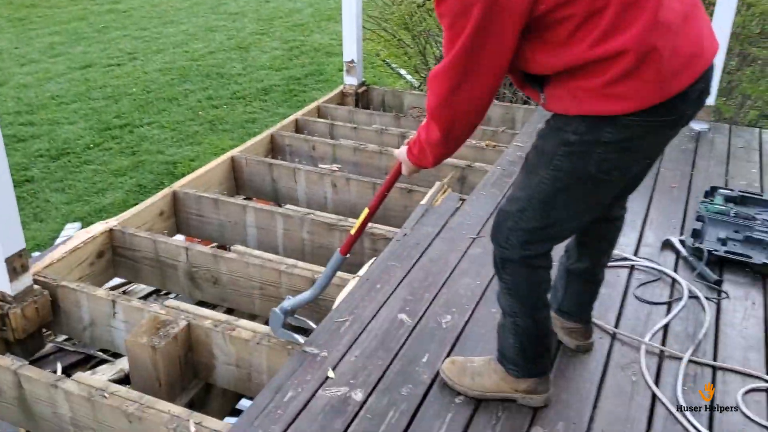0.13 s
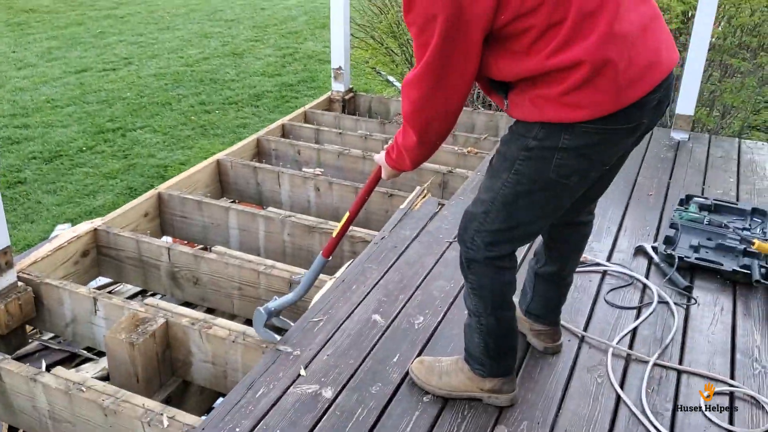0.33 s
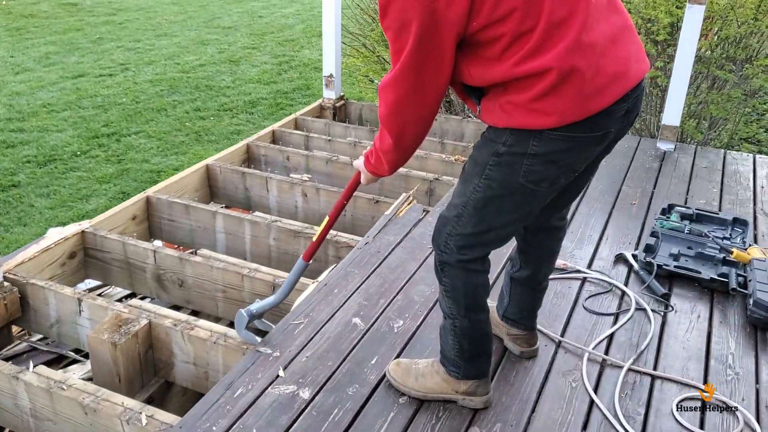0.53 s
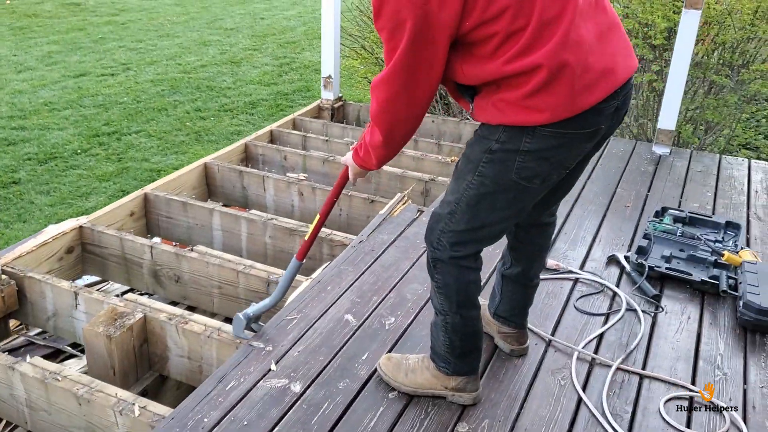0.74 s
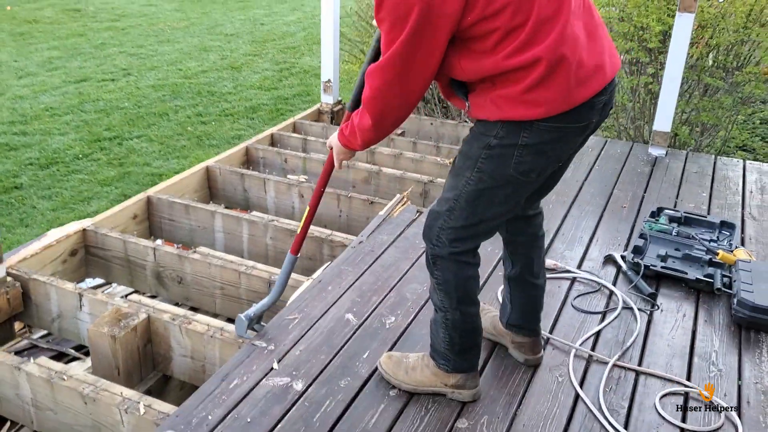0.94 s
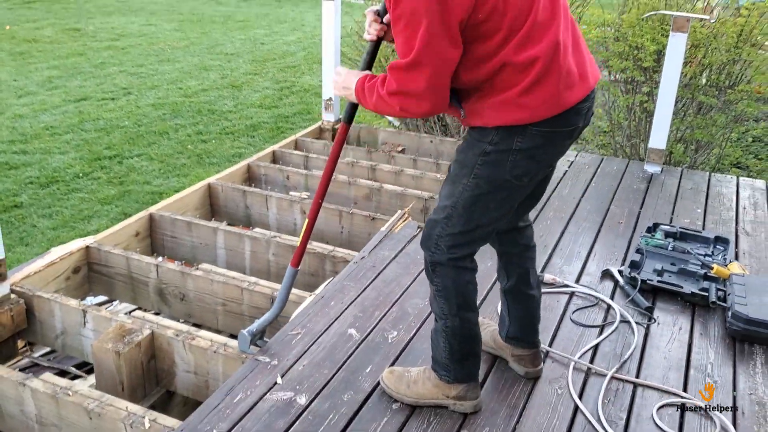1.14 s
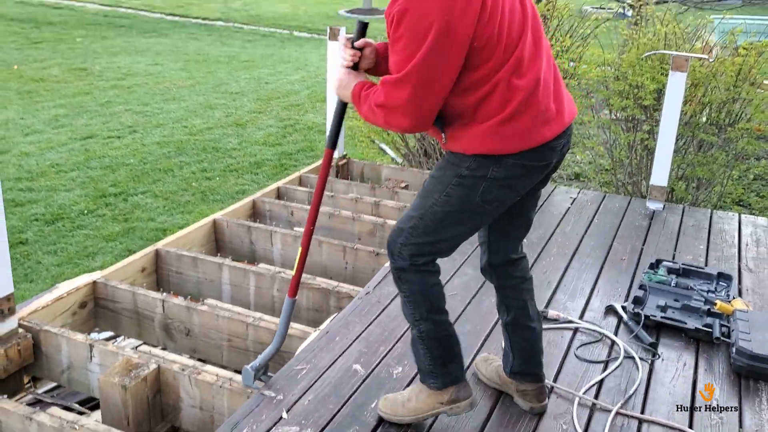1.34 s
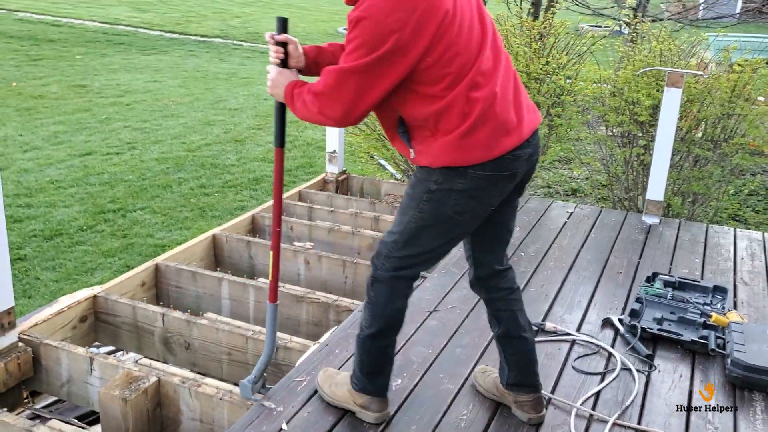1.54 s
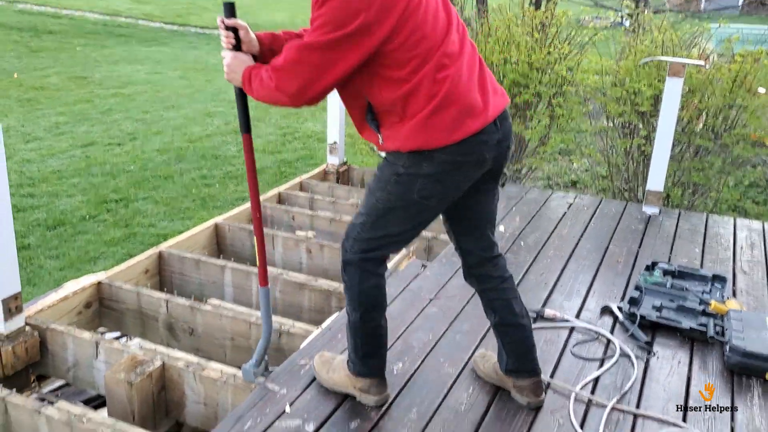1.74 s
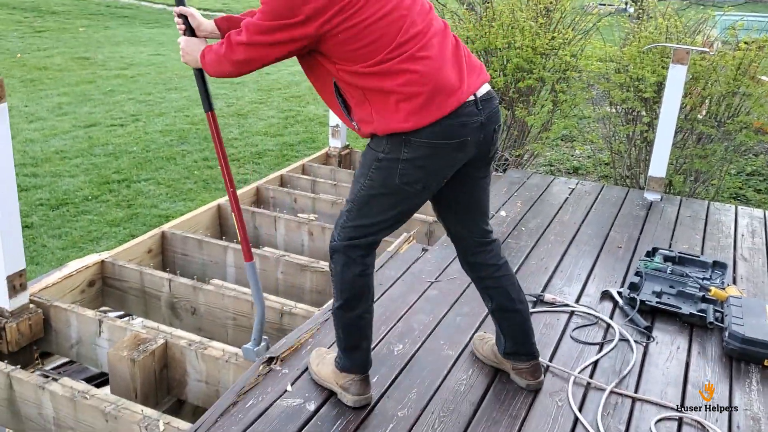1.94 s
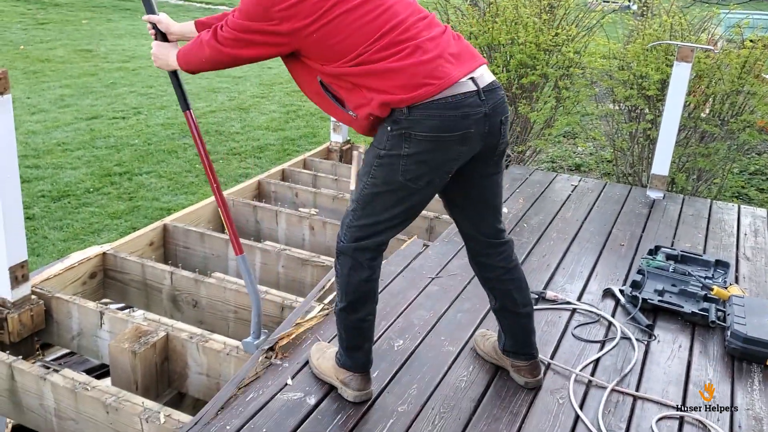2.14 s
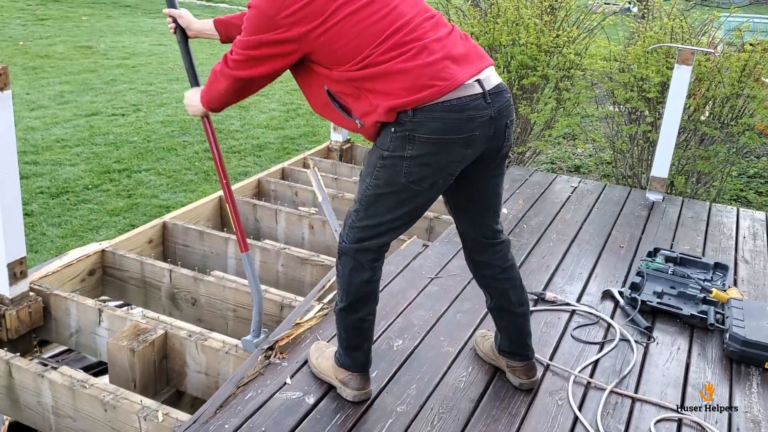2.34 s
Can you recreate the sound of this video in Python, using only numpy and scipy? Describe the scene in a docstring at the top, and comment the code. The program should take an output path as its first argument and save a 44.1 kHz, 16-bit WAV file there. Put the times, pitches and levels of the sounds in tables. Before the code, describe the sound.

Wood cracking: a pry bar knocks on deck boards, then a rotten plank splits with heavy thumps

```python
"""Quiet outdoor air, then a steel pry bar taps and knocks on old deck boards, scrapes, skids and rings.
Levered back, it splits a rotten board in a run of cracks with tearing fibres and heavy thumps.
A faint scrape and a lone tick close the scene.
Wood is coloured noise shaped by decaying blows, thumps and steel are decaying sines, friction and
tearing are showers of tiny snaps, and the joists answer each jolt with a low noise rumble."""
import sys
import numpy as np
from scipy import signal
from scipy.fft import rfft, irfft
from scipy.io import wavfile
from scipy.ndimage import uniform_filter1d

SR = 44100
rng = np.random.default_rng(int(sys.argv[2]) if len(sys.argv) > 2 else 0)


def bounce(signal):
    """Save signal as a 16-bit WAV file at the path given by the first command-line argument."""
    frames = np.transpose(np.atleast_2d(signal))
    limited = np.clip(frames, -1, 1)
    pcm = np.round(limited * 32767).astype(np.int16)
    wavfile.write(sys.argv[1], SR, pcm)


N = 110250
TIME = np.arange(N) / SR  # s


def from_db(db):
    """Decibels to gain."""
    return 10 ** (np.asarray(db) / 20)


def rms_one(x):
    """Scale to rms 1."""
    return x / np.sqrt(np.mean(x ** 2) + 1e-20)


def at_hz(points, hz):
    """Read a spectrum on a log-frequency axis."""
    f, value = np.transpose(points)
    return np.interp(np.log(hz + 1), np.log(f), value)


# how alike left and right are: (f/Hz, likeness from 0 to 1)
STEREO_LIKENESS = [(100,0.93),(300,0.97),(600,0.78),(1200,0.51),(2500,0.29),(5000,0.1),(14000,0.16)]


def noise(spectrum, low_hz=15, high_hz=20000):
    """Coloured stereo noise in a band, broadly wider toward the treble; rms 1."""
    hz = np.arange(N // 2 + 1) * SR / N
    alike = np.clip(at_hz(STEREO_LIKENESS, hz), 0, 1)
    mid, side = rfft(rng.standard_normal((2, N)))
    pair = np.sqrt(1 + alike) * mid + np.sqrt(1 - alike) * side * [[1], [-1]]
    in_band = (hz > low_hz) * (hz < high_hz)
    return rms_one(irfft(pair * from_db(at_hz(spectrum, hz)) * in_band, N))


def even(x, window_s):
    """Hold the level of a noise steady, so that the blow alone shapes it."""
    power = np.mean(np.abs(signal.hilbert(x)) ** 2, axis=0) / 2
    return x / np.sqrt(uniform_filter1d(power, max(1, int(window_s * SR))) + 1e-6)


def swell(s, rise_s, t60):
    """Quick rise at time s, then exponential decay."""
    age = np.maximum(TIME - s, 0)
    rise = 1 - np.exp(-np.minimum(age / rise_s, 20))
    return rise * from_db(-60 * np.minimum(age / t60, 2))


def dying(times, db, t60):
    """Power left by a series of blows, each dying at the same rate."""
    kicks = np.zeros(N)
    np.add.at(kicks, (np.asarray(times) * SR).astype(int), from_db(db) ** 2)
    keep = np.exp(-2 * np.log(1000) / (t60 * SR))
    return signal.lfilter([1], [1, -keep], kicks + 1e-18)


def softened(power, rise_s):
    """Amplitude envelope of that power, with a rounded attack."""
    r = np.exp(-1 / (rise_s * SR))
    return np.sqrt(signal.lfilter([1 - r], [1, -r], power))


# resonances that stand out of the timber's colour: (f/Hz)
BOARD_RESONANCES = [197, 281, 382, 641, 835, 1011, 1169, 1295, 1410, 1600, 1790, 3274]
BOARD_MODE_DB, BOARD_MODE_WIDTH = 5.5, 0.0074  # height, and half-width as a share of the pitch


def with_modes(x):
    """Raise the resonances of the boards, then level to rms 1."""
    hz = np.arange(N // 2 + 1) * SR / N
    lift = sum(1 / (1 + ((hz / mode - 1) / BOARD_MODE_WIDTH) ** 2) for mode in BOARD_RESONANCES)
    return rms_one(irfft(rfft(x) * from_db(BOARD_MODE_DB * lift), N))


COLOUR_SHIFT_DB = 3.5  # rms spread of the wandering colour


def restless(x):
    """Let the timber's colour wander, as snaps start at different spots in the board."""
    cells = signal.stft(x, nperseg=512)[2]
    lift = rng.standard_normal(cells.shape[1:])
    lift = uniform_filter1d(lift, size=5, axis=0)  # across pitch
    lift = uniform_filter1d(lift, size=3, axis=1)  # across time
    return signal.istft(cells * from_db(COLOUR_SHIFT_DB * rms_one(lift)))[1][:, :N]


# colour of the struck timber, before its resonances: (f/Hz, level/dB per Hz)
TIMBER_COLOUR = [(150,-8),(210,-5),(280,4.5),(390,1.5),(490,-8),(570,-14),(700,-6.5),(1020,-9.5),(1450,-15),(1850,-12),(2600,-18.5),(3400,-9.5),(4400,-11.5),(5800,-20.5),(6900,-17.5),(8300,-27),(11000,-20.5),(15500,-22.5)]
YARD_DB, YARD_T60_S = -33.5, 0.49  # faint return from the yard, relative to each blow
LOWS_LINGER = 1.18  # the lower half of each range rings this much longer, the upper this much shorter


def timber(blows, decays, rise_s, gain_db, grain=1):
    """Blows excite dense wood modes: a short burst, a tail through the deck, a yard return."""
    s, *levels = np.transpose(blows)
    out = 0
    for db, (low, high, first, tail_db, tail) in zip(levels, decays):
        wood = even(restless(with_modes(noise(TIMBER_COLOUR, low, high))), 2 / low)
        if low > 2000:  # only snap and hiss take on the grain
            wood = wood * grain
        split = signal.butter(2, np.sqrt(low * high), fs=SR, output="sos")
        lower = signal.sosfiltfilt(split, wood)
        for half, stretch in ((lower, LOWS_LINGER), (wood - lower, 1 / LOWS_LINGER)):
            burst = dying(s, db, first * stretch)
            deck_tail = dying(s, db + tail_db, tail * stretch)
            yard = dying(s, db + YARD_DB, YARD_T60_S)
            # low ranges speak a little more slowly
            out = out + softened(burst + deck_tail + yard, rise_s + .5 / high) * half
    return from_db(gain_db) * out


def grains(spans, spectrum, per_s, spread_db, grain_t60):
    """Tiny snaps of uneven size at random moments, swelling and fading over each span."""
    level = 0
    for start, end, db in spans:
        progress = np.clip((TIME - start) / (end - start), 0, 1)
        level = level + from_db(db) * np.sqrt(np.abs(np.sin(np.pi * progress)))
    happens = rng.random(N) < per_s / SR
    sizes = from_db(spread_db * np.minimum(rng.exponential(1, N), 4))
    clicks = rms_one(happens * sizes * rng.choice([-1, 1], N)) * level
    # ten different snaps, dealt out at random
    dealt = rng.integers(0, 10, N)
    source, size, out = noise(spectrum), 1024, 0
    for k in range(10):
        snap = source[:, k * size:(k + 1) * size] * from_db(-60 * TIME[:size] / grain_t60)
        snap = rms_one(snap) / np.sqrt(size)
        out = out + signal.oaconvolve([clicks * (dealt == k)], snap, axes=1)[:, :N]
    return out


# distant outdoor murmur: (f/Hz, level/dB per Hz, relative)
AIR_COLOUR = [(20,-34.5),(55,2),(110,-5.5),(260,-14),(500,-21),(1100,-26),(2000,-28.5),(2650,-37),(4000,-26.5),(6500,-33),(8000,-40),(16000,-47)]
AIR_DB = -54  # rms


def outdoor_air():
    """A distant murmur: steady, coloured stereo noise."""
    return from_db(AIR_DB) * noise(AIR_COLOUR)


# the blade's edge taps the wood: (t/s, level/dB, f/Hz)
EDGE_TAPS = [(0.097,-42,1590),(0.128,-42,3540),(.327,-32,1980),(0.647,-39,1030),(0.661,-43.5,1930),(.699,-42.5,1120),(0.702,-35.5,1700),(0.743,-26,1705)]
TAP_RISE_S, TAP_T60_S = 0.00066, 0.074
# the noise band reaches this ratio either side of its pitch, and is this much weaker there
TAP_SPREAD, TAP_SKIRT_DB = 1.6, -26


def taps():
    """Each tap wakes the damped resonances around one pitch, heard as a decaying noise band."""
    out = 0
    for s, db, hz in EDGE_TAPS:
        low, high = hz / TAP_SPREAD, hz * TAP_SPREAD
        cluster = noise([(low, TAP_SKIRT_DB), (hz, 0), (high, TAP_SKIRT_DB)], low, high)
        out = out + from_db(db) * swell(s, TAP_RISE_S, TAP_T60_S) * even(cluster, 10 / hz)
    return out


# a board or the frame swings at one pitch: (t/s, level/dB before rise and decay, f/Hz, rise/s, t60/s)
BOARD_THUMPS = [(0.127,-22,343,0.0016,0.098),(0.341,-25,321,0.011,0.094),(0.653,-15,237,0.001,0.024),(0.741,3,259.3,0.011,0.092),(.747,-11,382,0.0065,0.13),(0.811,-18,481,0.0025,0.061),(.810,-16,620,0.0012,0.06),(0.806,-22.5,116.2,0.0089,0.2),(1.11,-31,287,0.0068,0.073),(1.53,-20,425.5,0.01,0.12),(1.7245,0,1025,0.0015,0.022),(1.726,-15,311,0.0017,0.13),(1.786,-12,272,0.0061,0.081),(1.883,2.5,300,0.0022,0.026),(1.965,-26,230,0.0011,0.35),(2.066,-3.5,443,0.00015,0.059),(2.068,-22,301.4,0.0027,0.16),(2.111,-17.5,76.2,0.0036,0.14)]


def thumps():
    """The strongest blows set one mode swinging above the rest: a decaying sine."""
    out = 0
    for s, db, hz, rise, t60 in BOARD_THUMPS:
        out = out + from_db(db) * swell(s, rise, t60) * np.sin(2 * np.pi * hz * (TIME - s))
    return out


# the bar knocks on the boards, before the gain:
# (t/s, hollow body level/dB, knock level/dB, snap level/dB, splinter hiss level/dB)
BAR_KNOCKS = [(.129,-26.5,-30,-44,-61),(.281,-44,-40,-55,-66),(.327,-51,-51,-44,-75),(.342,-25,-32,-40.5,-57),(.646,-35,-54,-77,-80),(.658,-25.5,-47,-43,-67),(.736,-18,-27.5,-41,-54),(.742,-18.5,-22,-29.5,-46),(.765,-30.5,-33,-41,-53),(.800,-45,-28.5,-40.5,-47),(.809,-12.5,-21,-30,-37.5),(.826,-23.5,-30.5,-60,-62),(.953,-35,-42,-58,-70)]
# how body, knock, snap and hiss die, before the lows linger:
# (low f/Hz, high f/Hz, first t60/s, tail level/dB, tail t60/s)
BAR_KNOCK_DECAY = [(153.8,620,0.025,-5,0.22),(534,2350,0.038,-13.5,0.14),(2337,7700,0.023,-9,0.084),(7500,18000,0.038,-16,0.1)]


def knocks():
    """The bar strikes sound boards: hollow bodies and dry snaps."""
    return timber(BAR_KNOCKS, BAR_KNOCK_DECAY, rise_s=0.0011, gain_db=1.5)


# the frame is jolted: (t/s, level/dB)
FRAME_JOLTS = [(0.129,-40),(.27,-39),(0.649,-33),(0.789,-30),(1.496,-37),(1.871,-30),(2.05,-29.5),(2.18,-42)]
# colour of the rumble: (f/Hz, level/dB per Hz, relative)
JOIST_COLOUR = [(25,-13.5),(45,-3),(60,0),(100,3),(150,-6),(240,-9.5),(400,-43)]
JOIST_RISE_S, JOIST_T60_S = 0.044, 0.52


def joists():
    """The frame rumbles on after each jolt: low noise with a slow attack and long decay."""
    s, db = np.transpose(FRAME_JOLTS)
    rumble = even(noise(JOIST_COLOUR, low_hz=39.4), 0.035)
    return softened(dying(s, db, JOIST_T60_S), JOIST_RISE_S) * rumble


FRICTION_GRAINS_PER_S, FRICTION_SPREAD_DB = 2000, 3  # average rate and unevenness, scrapes and skids
# the blade rubs along the wood: (start t/s, end t/s, level/dB)
BLADE_SCRAPES = [(.245,.37,-51.5),(.94,1.01,-49.5),(1.25,1.52,-58),(2.2,2.45,-58.5)]
# colour of the rub: (f/Hz, level/dB per Hz, relative)
SCRAPE_COLOUR = [(300,3),(1000,-0.5),(4500,-9),(8000,-12.5),(16000,-15.5)]


def scrapes():
    """The blade rubs the wood in a dense shower of tiny snaps."""
    return grains(BLADE_SCRAPES, SCRAPE_COLOUR, FRICTION_GRAINS_PER_S, FRICTION_SPREAD_DB, grain_t60=0.017)


# the steel edge skids: (start t/s, end t/s, level/dB)
EDGE_SKIDS = [(.475,.535,-63.5),(.497,.505,-47.5),(.660,.674,-63)]
# colour of the rasp: (f/Hz, level/dB per Hz, relative)
SKID_COLOUR = [(2500,-33),(3800,1),(5000,6),(7000,-10),(9000,10),(12000,9.5),(16000,-21)]


def skids():
    """The steel edge skids with a thin, bright rasp of short snaps."""
    return grains(EDGE_SKIDS, SKID_COLOUR, FRICTION_GRAINS_PER_S, FRICTION_SPREAD_DB, grain_t60=0.012)


# the steel rings: (t/s, level/dB)
STEEL_CLINKS = [(0.664,-40),(.709,-52),(0.743,-57),(.810,-56)]
# modes of the bar: (f/Hz, level/dB relative to the clink, t60/s)
STEEL_MODES = [(3225,-8.5,0.27),(4050,-8,.12),(5464,-3,0.1),(6680,-1,.05),(7031,-3,.1),(8560,-5,0.14),(8860,-5,0.1),(12090,-3,.1),(13730,-9,0.13),(14380,-2,.11)]
# the blade stays on the wood, so its ring is uneven
STEEL_CHATTER, CHATTER_S = .7, 0.003  # rms depth, smoothing


def steel():
    """The bar's modes ring unevenly, with new strengths at every touch and on each side."""
    s, db = np.transpose(STEEL_CLINKS)
    out = np.zeros((2, N))
    for hz, mode_db, t60 in STEEL_MODES:
        for side in out:
            touch_db = db + mode_db + rng.normal(0, 0.44, len(s))
            level = softened(dying(s, touch_db, t60), 0.00046)
            wobble = uniform_filter1d(rng.standard_normal(N), int(CHATTER_S * SR))
            chatter = 1 + STEEL_CHATTER * rms_one(wobble)
            side += level * chatter * np.sin(2 * np.pi * (hz * TIME + rng.random()))
    return out


# single fibres give under strain: (t/s, level/dB)
FIBRE_TICKS = [(1.092,-47),(1.235,-39.5),(1.333,-41.5),(1.418,-42),(1.49,-46.5),(2.295,-38)]
TICK_T60_S = 0.016


def ticks():
    """Lone dry ticks of strained wood: instant, short bursts of bright noise."""
    s, db = np.transpose(FIBRE_TICKS)
    colour = [(2500, -1), (4500, 3), (9000, -5.5), (16000, 3.0)]  # (f/Hz, level/dB per Hz)
    return np.sqrt(dying(s, db, TICK_T60_S)) * noise(colour)


# fibres tear: (start t/s, end t/s, level/dB)
FIBRE_TEARS = [(1.512,1.61,-40),(1.80,1.93,-26),(2.026,2.075,-28),(2.15,2.21,-41)]
# colour of the tearing: (f/Hz, level/dB per Hz, relative)
TEAR_COLOUR = [(300,-2),(1000,-1.5),(1900,0),(4000,-10.5),(7000,-8.5),(8500,-19),(16000,-20.5)]


def tears():
    """Fibres part in a sparse crackle: an average 260 snaps a second."""
    return grains(FIBRE_TEARS, TEAR_COLOUR, per_s=260, spread_db=2.5, grain_t60=0.027)


JERK_DB, JERK_S = 3.5, .0008  # size and length of the jerks within a crack


def splintery():
    """Fibres part in uneven jerks: a spiky gain of rms 1."""
    jerks = rms_one(uniform_filter1d(rng.standard_normal(N), int(JERK_S * SR)))
    return rms_one(from_db(JERK_DB * np.minimum(jerks, 2)))


# the board splits, before the gain:
# (t/s, hollow body level/dB, knock level/dB, snap level/dB, splinter hiss level/dB)
BOARD_CRACKS = [(1.513,-45,-34.5,-27.5,-33),(1.525,-34,-23.5,-21.5,-22),(1.577,-33,-29,-27,-35.5),(1.709,-36.5,-24.5,-23.5,-26),(1.725,-24,-10,-18.5,-35),(1.757,-37,-21.5,-30,-38),(1.776,-23,-14,-13,-24),(1.805,-23.5,-14,-30,-36),(1.814,-16,-11.5,-16,-26.5),(1.829,-26.5,-12.5,-20.5,-23),(1.833,-30.5,-18.5,-24.5,-24),(1.839,-34.5,-15,-16.5,-19),(1.844,-15.5,-14,-19,-41),(1.859,-38,-9,-14,-30.5),(1.868,-17.5,-17.5,-10.5,-18),(1.882,-22,-11,-37,-40),(1.911,-22,-31,-20,-27),(1.915,-21.5,-20.5,-17.5,-27),(1.933,-25.5,-22.5,-25.5,-30),(1.955,-24,-18.5,-18.5,-24),(2.044,-29.5,-19,-23.5,-29),(2.048,-16.5,-9,-15,-29.5),(2.054,-20,-6,-15,-25),(2.066,-13.5,-37.5,-30.5,-33),(2.137,-49,-27.5,-21.5,-33.5),(2.161,-39,-30,-16,-24),(2.187,-41.5,-54,-26,-36.5)]
# how body, knock, snap and hiss die, before the lows linger:
# (low f/Hz, high f/Hz, first t60/s, tail level/dB, tail t60/s)
BOARD_CRACK_DECAY = [(162,620,0.046,-8,.28),(657,2350,0.016,-9.5,0.087),(2384,7700,0.0053,-10,0.082),(7900,15000,0.0098,-11.5,0.094)]


def cracks():
    """The rotten board splits in a run of sharp breaks, splintery in the treble."""
    return timber(BOARD_CRACKS, BOARD_CRACK_DECAY, rise_s=0.00047, gain_db=2.5, grain=splintery())


LEFT_DB, LEFT_LAG_S = 1.25, -0.000071  # left is louder, and leads


def scene():
    """The work lies slightly to the left, over quiet outdoor air."""
    wood = taps() + thumps() + knocks() + joists() + ticks() + cracks()
    left, right = wood + scrapes() + skids() + steel() + tears()
    left = np.interp(TIME - LEFT_LAG_S, TIME, left) * from_db(LEFT_DB)
    return np.array([left, right]) + outdoor_air()


CUTOFF_HZ = 16100


def record(dry):
    """The highest peaks are rounded toward 0.9, then the top is cut steeply."""
    held = dry / (1 + (dry / .9) ** 6) ** (1 / 6)
    top_cut = signal.ellip(10, .1, 80, CUTOFF_HZ, fs=SR, output="sos")
    return signal.sosfilt(top_cut, held)


dry = scene()
out = record(dry)
bounce(out)
```